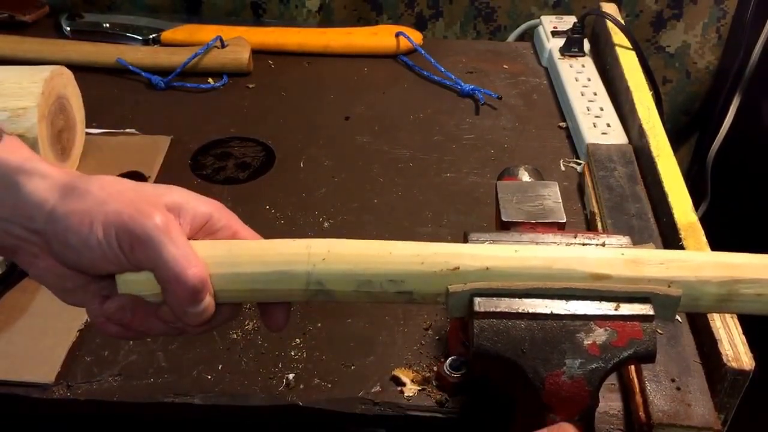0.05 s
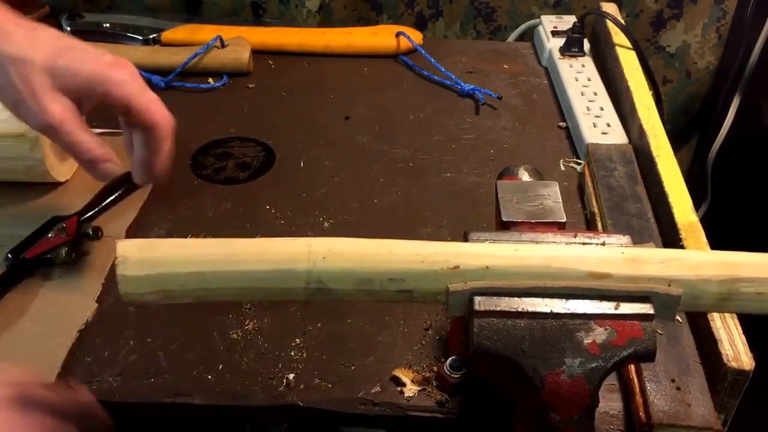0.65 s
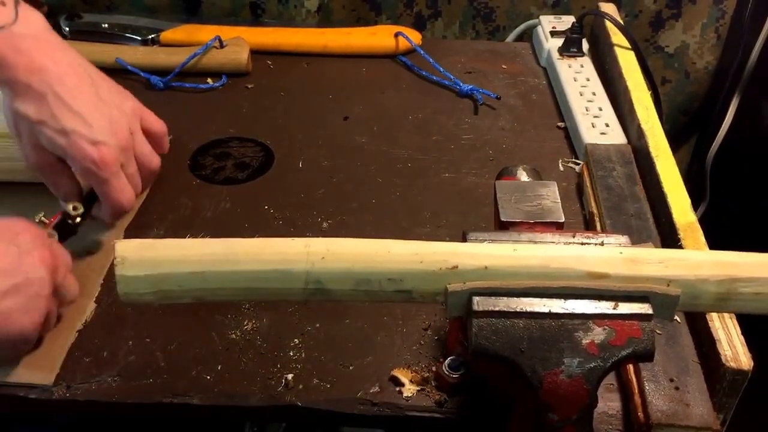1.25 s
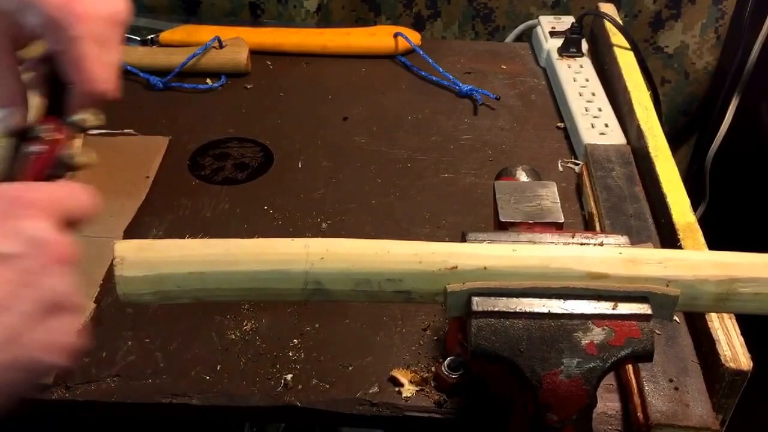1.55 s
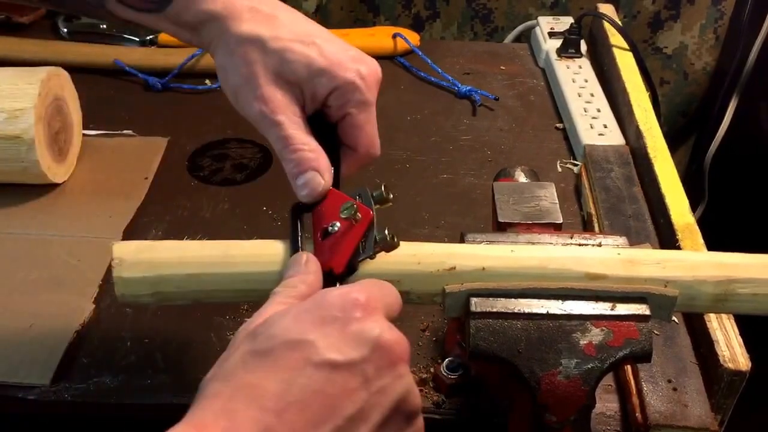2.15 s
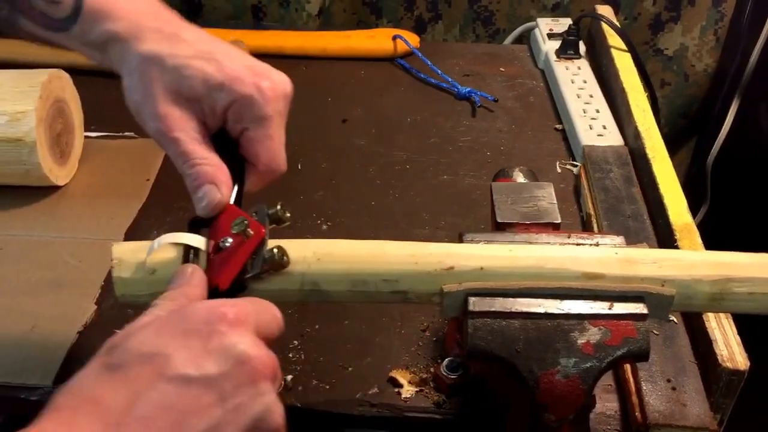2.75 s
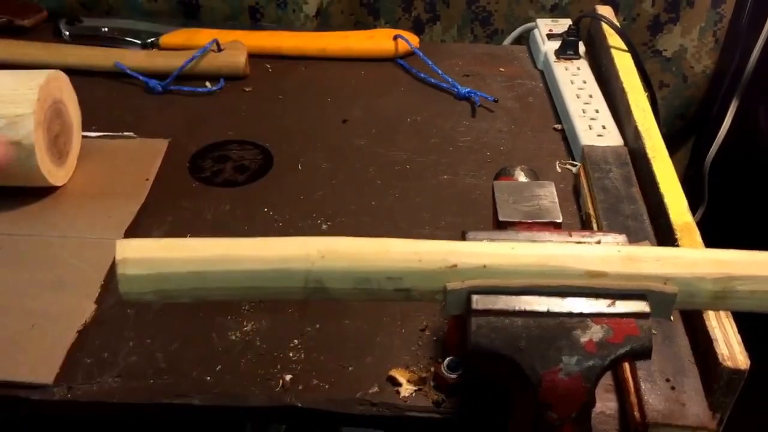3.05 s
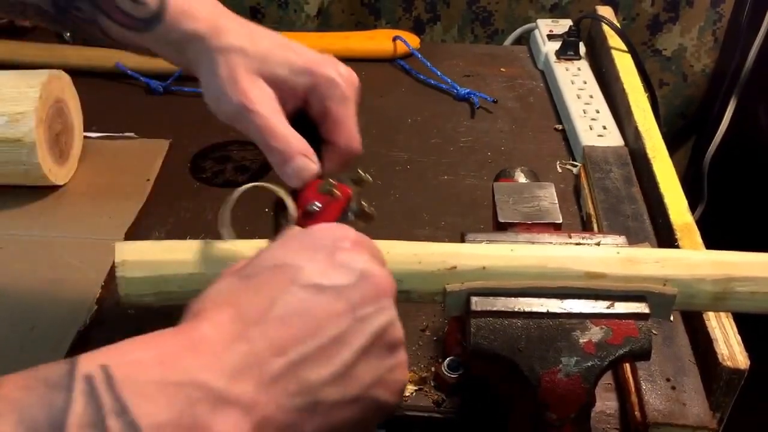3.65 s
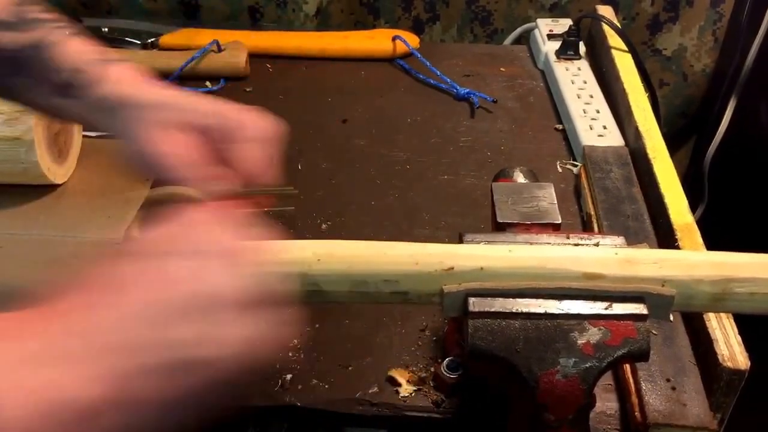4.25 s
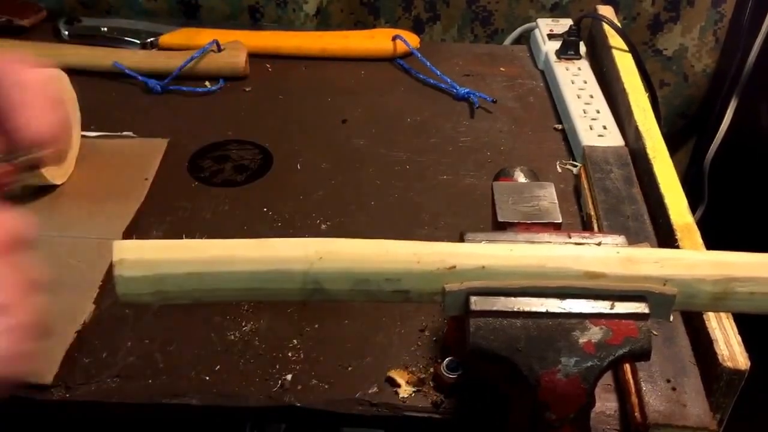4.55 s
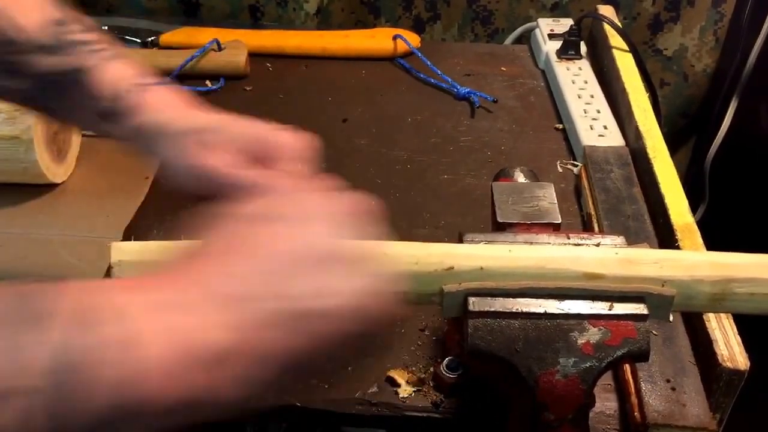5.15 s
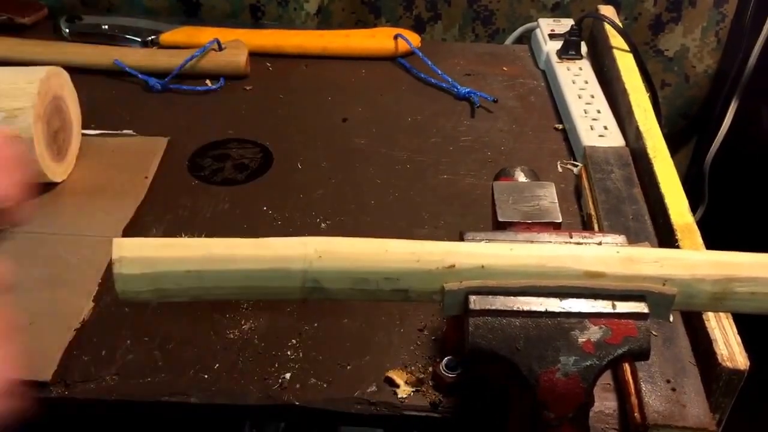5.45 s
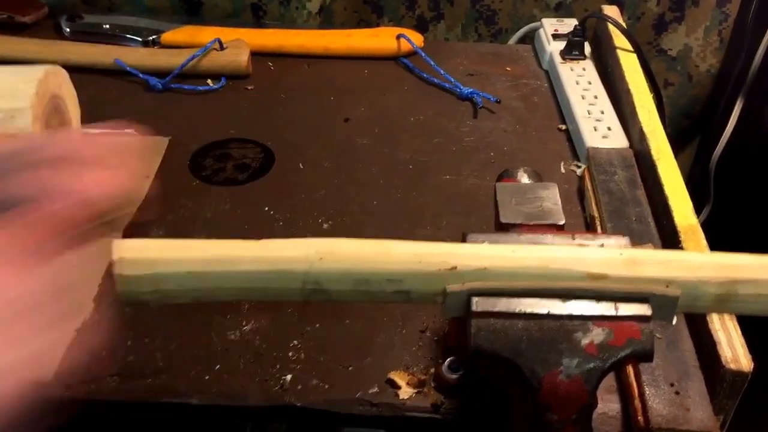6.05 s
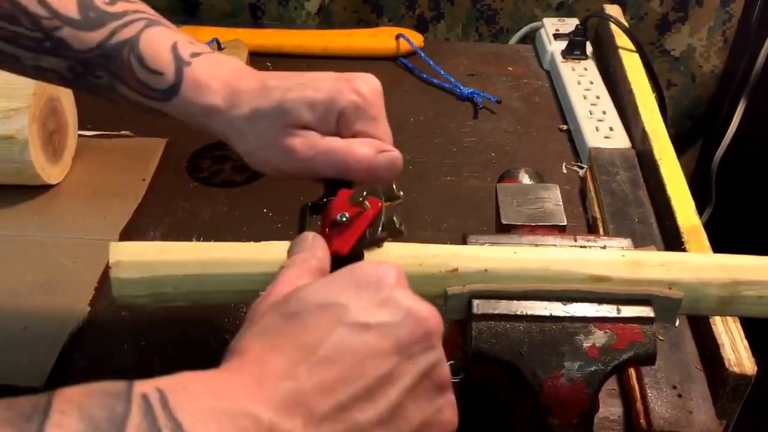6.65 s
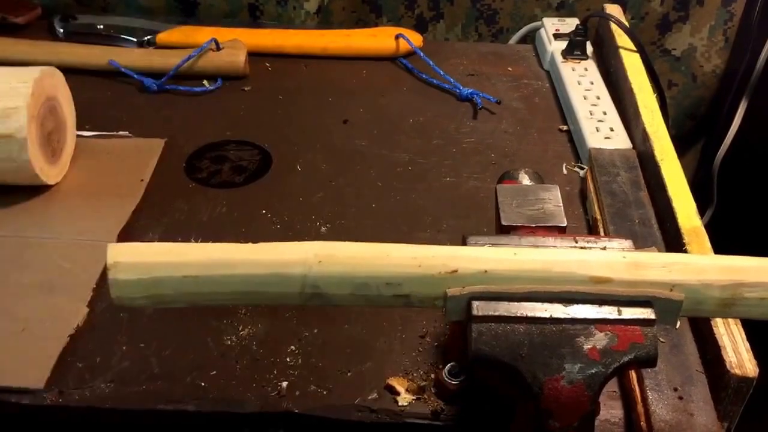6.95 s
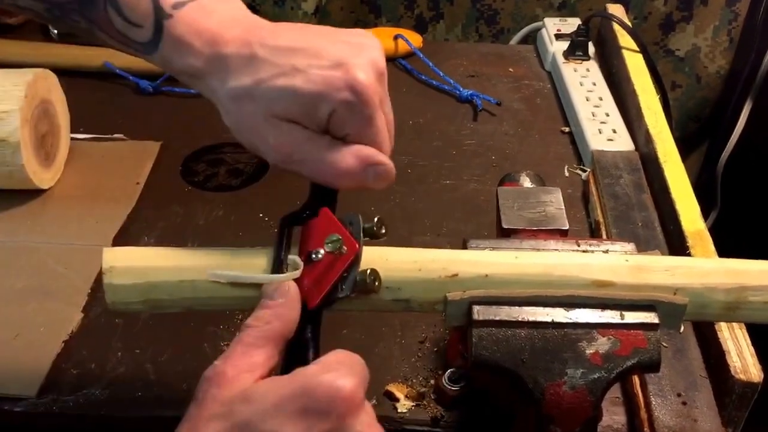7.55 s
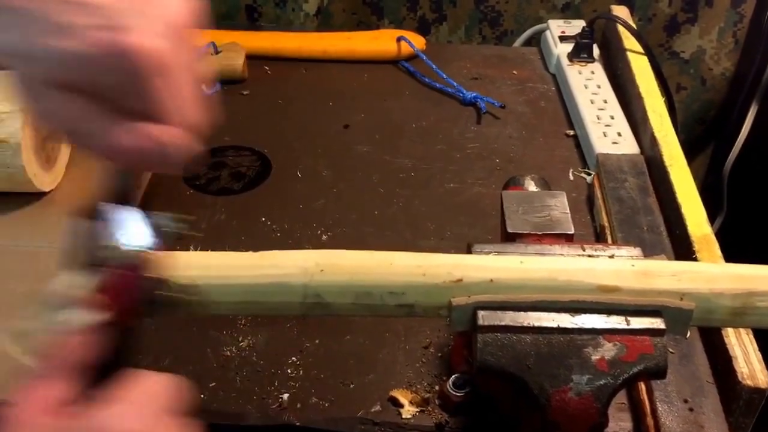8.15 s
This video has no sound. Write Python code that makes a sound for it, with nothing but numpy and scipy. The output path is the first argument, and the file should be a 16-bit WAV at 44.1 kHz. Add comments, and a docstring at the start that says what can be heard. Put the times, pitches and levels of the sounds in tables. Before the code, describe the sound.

In a small, quiet workshop, a light object ticks as it rocks to rest and a tool slides softly off cardboard. After a few knocks, a spokeshave is pulled along a wooden handle in a vise, about once a second. Each short hissing cut ends in a splintery crack and a bench thump, sometimes with a high metal zing. Loose things rattle and the tool knocks between strokes, all heard close up.

```python
"""A spokeshave is pulled in quick strokes along a wooden handle in a bench vise, in a small workshop.
Each cut hisses as fibres break, then the shaving tears off the end: splinters snap, the bench booms,
the blade zings, and loose things on the bench rattle, buzz and tinkle. Tool and handle knock between
strokes. Before the work starts, a light object rocks to rest and the tool slides off cardboard."""
import sys
import numpy as np
from scipy import signal
from scipy.fft import rfft, irfft
from scipy.io import wavfile
from scipy.ndimage import uniform_filter1d

SR = 44100
rng = np.random.default_rng(int(sys.argv[2]) if len(sys.argv) > 2 else 0)


def to_wav(s):
    """Save 16-bit WAV."""
    ch = np.atleast_2d(s).T  # columns
    pcm = np.round(np.clip(ch, -1, 1) * 32767)  # PCM
    wavfile.write(sys.argv[1], SR, pcm.astype(np.int16))


N = 366030

# edges of the bass, mid, bright and treble bands: f/Hz
BAND_EDGES = [45, 280, 1600, 4500, 17000]
# the workshop's tail in those four bands: t60/s, level/dB
ROOM_TAIL = [(0.34, 0.5), (0.31, -8.5), (0.28, -5.5), (0.26, -10)]
# slap off the bench top and the nearest things: delay/s, level/dB
NEAR_ECHOES = [(.00135, -41), (.0031, -20), (.0058, -12)]
# broad EQ of room tone, light taps, breaking fibres and tearing wood: f/Hz, gain/dB
ROOM_EQ = [(18, -70), (30, -12.5), (66, -2.5), (256, -3.5), (315, -2), (379, 1), (505, -12.5),
           (1510, -15.5), (1680, -14), (2240, -13.5), (2760, -17.5), (3590, -20), (4310, -23.5),
           (6720, -25.5), (15500, -33.5)]
TAP_EQ = [(30, -27.5), (100, -4), (400, 4), (1200, 0), (2500, -14.5), (3800, -15.5), (5000, -26.5),
          (8000, -23.5), (11000, -36), (16000, -44)]
FIBRE_EQ = [(30, -10.5), (65, -2), (160, -1.5), (260, -5), (700, 0.5), (1300, 0), (2500, -7.5),
            (3800, -16.5), (5000, -26), (8000, -22), (16000, -27)]
WOOD_EQ = [(30, -18.5), (60, -15.5), (160, -6), (260, -10.5), (700, -7), (1200, -10.5), (2400, -9),
           (4800, -19), (8000, -15.5), (10500, -25), (16000, -30.5)]
# resonances of the rocking object, loose tools and bench with handle: f/Hz, width/Hz, boost/dB
ROCKER_PEAKS = [(461, 8.8, 21), (668, 30, 14.5), (1051, 26, 25.7), (1150, 35, 14.6), (1402, 77, 19.3),
                (2120, 230, 13.3), (3424, 390, 8.9)]
LOOSE_PEAKS = [(135.5, 20, 26.5), (425, 55, 12.8), (730, 80, 14.9), (860, 66, 8.5), (1390, 52, 4.9),
               (2910, 110, 10), (3360, 97, 6.9), (5600, 220, 11), (6450, 250, 10), (13800, 660, 9.8)]
BENCH_PEAKS = [(68.9, 8, 23), (127.7, 21, 24), (207.1, 17, 16.5), (295.4, 10.3, 12.5), (382, 75, 8.5),
               (447.5, 11, 11), (474.2, 14, 14.5), (568, 36, 3), (721.6, 30, 7.5), (842, 34, 9),
               (930, 17, 5.5), (1014, 25, 10), (1087.6, 23, 7.5), (1857, 18, 13), (3040, 40, 1),
               (3145, 47, 8), (3190, 1030, 7), (5630, 880, 6.5), (8400, 68, 5), (9200, 100, 4),
               (14300, 700, 6.5)]
# ringing modes of the rocking object, a steel part, a tiny metal piece, the blade: f/Hz, level/dB, t60/s
ROCKER_MODES = [(1029, -1, 0.039), (1390, 5.5, 0.014), (2360, 18, 0.027), (2660, 8, 0.035)]
STEEL_MODES = [(5810, -23.5, 1), (6174, -4.5, 0.25), (6205, -16, 0.32), (8170, -30, 0.48),
               (8640, -28.5, 0.5)]
TINY_MODES = [(10950, -1, 0.13), (11200, -14, 0.098)]
BLADE_MODES = [(7350, 2.5, 0.072), (7440, -27, .05), (14250, -38, 0.057)]
# ticks of the rocking object: t/s
ROCK_TIMES = [0.056, 0.159, 0.261, 0.365, 0.43, 0.484, 0.682, 0.741, 0.84, 0.909, 1.007, 1.07, 1.152, 1.227,
              1.319, 1.368, 1.452, 1.493, 1.562, 1.598, 1.662]
# loose things rattle after a jolt; negative rates build up instead:
# start/s, end/s, level/dB, fade/(dB/s), hardness/dB, dulling/(dB/s)
RATTLES = [(3.136, 4.046, -34.5, 21, 4.5, 27), (4.467, 5.176, -36, 10.5, 2, 3),
           (5.44, 5.844, -46.5, -24, -4, -7), (6.202, 6.717, -36, 42, 7, 24), (7.92, 8.29, -33, 52, 1, 15)]
# their distinct bounces: t/s
BOUNCE_TIMES = [3.204, 3.332, 3.38, 3.424, 3.486, 3.525, 3.618, 3.678, 3.809, 3.885, 4.532, 4.56, 4.61,
                4.68, 4.738, 4.806, 4.856, 4.916, 5.044, 5.459, 6.329, 6.396, 6.429]
# metal parts sing while they chatter: start/s, end/s, f/Hz, width/Hz, opening level/dB
BUZZES = [(3.445, 3.771, 3700, 250, -64.5), (4.528, 5.128, 2935, 131, -54.5),
          (5.514, 5.721, 3400, 110, -60), (5.742, 5.86, 3411, 230, -49), (6.151, 6.577, 5816, 9.7, -62),
          (6.217, 6.69, 1990, 6.1, -52), (6.255, 6.65, 3531, 89, -60.5), (6.98, 7.103, 3100, 260, -53),
          (7.356, 7.484, 4130, 310, -63.5), (7.394, 7.701, 1660, 110, -60.5),
          (8.133, 8.201, 2003, 7.5, -43), (8.134, 8.246, 3506, 31, -56.5)]
# the steel part pings, the tiny piece tinkles, the blade zings, splinters snap: t/s, level/dB
PINGS = [(2.829, -24.5), (4.529, -44), (6.412, -50), (8.132, -34.5)]
TINKLES = [(3.175, -53), (3.320, -47.5), (6.247, -48), (6.380, -55), (7.047, -39), (7.165, -58),
           (7.950, -49), (8.087, -50.5)]
ZINGS = [(4.384, -19.5), (5.315, -20), (6.119, -25.5), (6.945, -29), (6.958, -25)]
SNAPS = [(3.019, -43.5), (3.046, -29.5), (3.076, -34), (3.083, -36), (4.094, -48), (4.373, -41),
         (4.382, -33), (4.394, -35.5), (5.289, -35), (5.314, -28.5), (5.35, -32), (5.629, -48.5),
         (6.109, -37), (6.119, -30.5), (6.132, -32), (6.162, -38), (6.944, -37), (6.958, -33.5)]
# knocks of tool, handle and things on the bench: t/s, level/dB, hardness/dB, thud/dB, ring f/Hz
KNOCKS = [(0.445, -48, 6.5, 0, 2580), (0.547, -33.5, 10.5, -3, 2060), (0.797, -48, -3, -1, 510),
          (2.829, -37.5, 5, -8, 3700), (2.864, -26, 1.5, -6, 966), (2.926, -30, 0.5, -26, 1390),
          (3.279, -31.5, -1.5, -7, 734), (4.245, -44.5, 3, -2, 2780), (4.943, -30.5, 0.5, -6.5, 1730),
          (5.518, -33, -11, -15, 1170), (6.273, -32.5, -0.5, -4, 650), (6.481, -36, -18, -7, 1140),
          (7.988, -34.5, 0.5, -6, 1260), (8.132, -43, 1.5, -16, 740)]
# the tool's sole lands or bumps on the wood: t/s, level/dB, hardness/dB, thud/dB
LANDINGS = [(1.828, -39.5, 1, 0), (2.128, -49, 4, 7.5), (3.742, -41.5, -2, 3), (4.116, -29, -2.5, -3.5),
            (5.555, -41, -7, -1), (5.628, -25.5, -1.5, -3.5), (5.742, -41, 1.5, 4.5), (5.787, -43.5, 2, 7),
            (6.578, -34.5, 0.5, 0), (6.849, -39, 5, -6), (7.231, -52.5, -19, -6.5), (7.464, -34.5, -1, -3),
            (7.766, -35.5, 0, -8)]
# the tool slides, and the blade cuts: start/s, end/s, level/dB, swell/dB, drag offset/dB, hiss offset/dB
SLIDES = [(0.84, 0.905, -49.5, -8, -1, -13), (0.922, 1.27, -58, -6.5, 2, 4.5), (1.025, 1.045, -59, 9, 2, 8),
          (1.155, 1.205, -56, 2, 9, -3), (1.292, 1.388, -61, 0.5, -20, 9), (1.875, 1.9, -54.5, 4, 11, -8),
          (2.0, 2.17, -60, 5, 7.5, -21), (2.29, 2.39, -64.5, 6, 2, -4.5), (2.44, 2.53, -62.5, 3, 9.5, -22)]
STROKES = [(2.701, 2.791, -40.5, -2, 4, -8), (2.989, 3.036, -39.5, 22, 4, -1.5),
           (4.034, 4.121, -43.5, 8.5, 8, -8), (4.311, 4.373, -43, 17, 6.5, -3),
           (5.214, 5.287, -36, 6, 2.5, -7.5), (6.027, 6.107, -36, 0, 4.5, -6),
           (6.846, 6.924, -40.5, 12, 5, -3.5), (7.762, 7.854, -38, 7.5, 6.5, -7)]
# the shaving tears off the end: t/s, length/s, crunch level/dB, boom level/dB, hardness/dB
TEARS = [(3.047, 0.045, -23, -21, -2.5), (4.38, 0.047, -24, -15.5, 1.5), (5.296, 0.049, -26, -17, 0),
         (6.12, 0.049, -23, -21, -4), (6.938, 0.032, -23, -15.5, 1), (7.869, 0.035, -35, -22.5, -7.5)]


def from_db(db):
    return 10 ** (np.asarray(db) / 20)


def rms_one(x):
    return x / np.sqrt(np.mean(x ** 2) + 1e-20)


def add(out, s, sound):
    """Mixes a sound in from time s on."""
    at = int(s * SR)
    out[at:at + len(sound)] += sound[:N - at]


def band(x, low_hz, high_hz):
    return signal.sosfilt(signal.butter(3, [low_hz, high_hz], "band", fs=SR, output="sos"), x)


def through(x, response):
    return signal.fftconvolve(x, response)[:len(x)]


def drift(per_s):
    """Random wobble with an RMS of 1."""
    knots = rng.standard_normal(int(N / SR * per_s) + 2)
    return rms_one(np.interp(np.arange(N) / SR * per_s, np.arange(len(knots)), knots))


def envelopes(spans, rise, fall):
    """One gain curve per dB column; each span fades in and out by 60 dB over rise and fall seconds."""
    t, out = np.arange(N) / SR, 0
    for rows in spans:
        s, *columns = np.transpose(rows)
        fade_db = -60 * (np.maximum(s[0] - t, 0) / rise + np.maximum(t - s[-1], 0) / fall)
        out = out + from_db([np.interp(t, s, db) + np.maximum(fade_db, -150) for db in columns])
    return out


def body(eq, peaks, size=8192):
    """Impulse response of a broad EQ curve with resonances standing out of it."""
    hz = np.maximum(np.arange(size // 2 + 1) * SR / size, 1)
    eq_hz, eq_db = np.transpose(eq)
    power = 1 + sum((from_db(db) ** 2 - 1) / (1 + (2 * (hz - f) / width) ** 2) for f, width, db in peaks)
    gain = from_db(np.interp(np.log(hz), np.log(eq_hz), eq_db)) * np.sqrt(np.maximum(power, .1))
    # minimum phase: no ring ahead of the hit
    cepstrum = irfft(np.log(gain))
    cepstrum[1:size // 2] *= 2
    cepstrum[size // 2 + 1:] = 0
    return irfft(np.exp(rfft(cepstrum)))


def grains(per_s, spread_db):
    """Random tiny clicks of uneven size."""
    sizes = from_db(spread_db * np.minimum(rng.exponential(1, N), 4))
    return rms_one(sizes * rng.standard_normal(N) * (rng.random(N) < per_s / SR))


def contact(s, db, hardness_db, thud_db=0, *ring_hz):
    """A hit's cue with four band levels: weight lifts the bass, hardness the bright and treble."""
    return (s, db + thud_db, db, db + hardness_db, db + 1.72 * hardness_db, *ring_hz)


def hits(cues, response, t60, rise, crack, thump, room_db, trim_db, ring_db=0, ring_width_hz=90):
    """Each hit sends a push, a short scatter of reflections and the room's tail through a body."""
    out, t = np.zeros(N), np.arange(SR // 2) / SR
    attack_samples = SR // 50
    for s, *columns in cues:
        levels_db, rings_hz = columns[:4], columns[4:]
        scatter = rng.standard_normal(len(t)) * (1 - np.exp(-t / rise))
        for k, (tail_t60, tail_db) in enumerate(ROOM_TAIL):
            force = scatter * (from_db(-60 * t / t60) + from_db(tail_db + room_db - 60 * t / tail_t60))
            force[0] += crack if k else thump   # the bass feels the whole contact as one push
            sound = through(force, response)
            for hz in rings_hz:   # the struck spot favours one ring
                peak = signal.iirpeak(hz, hz / ring_width_hz, SR)
                sound = sound + from_db(ring_db) * signal.lfilter(*peak, sound)
            sound = band(sound, BAND_EDGES[k], BAND_EDGES[k + 1])
            strength = np.sqrt(np.sum(sound ** 2) / attack_samples)
            add(out, s, sound / strength * from_db(levels_db[k] + trim_db[k]))
    return out


def ring(touches, modes, rise):
    """Every touch sets the modes ringing, each with a slightly different strength."""
    out, t = np.zeros(N), np.arange(SR) / SR
    for s, touch_db in touches:
        partials = sum(np.sin(2 * np.pi * hz * t) * from_db(db + rng.normal(0, 1.54) - 60 * t / t60)
                       for hz, db, t60 in modes)
        add(out, s, partials * from_db(touch_db) * (1 - np.exp(-t / rise)))
    return out


def pressure_ramp(start, end, db, swell_db, drag_db, hiss_db):
    """Low drag, mid cut and top hiss follow the pressure along a pull, the hiss a little less."""
    return [(s, db + change + drag_db, db + change, db + 0.81 * change + hiss_db)
            for s, change in ((start, -swell_db / 2), (end, swell_db / 2))]


def scrape(pulls, per_s, spread_db, judder_db, rise, fall, trim_db):
    """Fibres catch and break under the tool; its judder clumps them, and the bench colours them."""
    fractures = grains(per_s, spread_db) * from_db(judder_db * drift(160))
    sound = through(fractures, body(FIBRE_EQ, BENCH_PEAKS))
    gains = envelopes([pressure_ramp(*pull) for pull in pulls], rise, fall)
    out = 0
    for gain, db, edges_hz in zip(gains, trim_db, [(35, 280), (280, 4500), (4500, 17000)]):
        part = band(sound, *edges_hz)
        # the grain is held at a steady loudness, so each pull swells or fades smoothly
        running_rms = np.sqrt(np.abs(uniform_filter1d(part ** 2, size=SR // 16)) + 1e-12)
        out = out + gain * from_db(db) * part / running_rms
    return out


def room_tone():
    """A quiet, dark bed of workshop air."""
    return from_db(-61.5) * rms_one(through(rng.standard_normal(N), body(ROOM_EQ, [])))


def near_field(x):
    """Close surfaces comb the upper range into narrow peaks and dips."""
    upper = band(x, 1300, 17000)
    out = x.copy()
    for delay, db in NEAR_ECHOES:
        add(out, delay, upper * from_db(db))
    return out


def rocking_object(settle_s=1.33):
    """A light object rocks from foot to foot, ticking and ringing, then comes quickly to rest."""
    s = np.array(ROCK_TIMES)
    fade_db_per_s = 5.5 + 2.0 * (np.arange(len(s)) % 2)   # one foot fades faster
    lost_db = fade_db_per_s * s + 36 * np.maximum(s - settle_s, 0)
    db = -41 - lost_db
    hardness_db = 0.21 * lost_db   # small swings tick more thinly
    ticks = hits(map(contact, s, db, hardness_db), body(TAP_EQ, ROCKER_PEAKS), t60=0.038, rise=0.0013,
                 crack=6.0, thump=5.4, room_db=-5, trim_db=(-10.0, -0.5, -5.5, -33))
    return ticks + ring(zip(s, db - 8.5), ROCKER_MODES, rise=0.0029)


def metal_buzz(fade_db=-11.5, flare_db=-5, flare_t60=0.066):
    """Fine chatter keeps one resonance of each loose metal part alive; it flares at every bounce."""
    out, flare = np.zeros(N), np.ones(N)
    t = np.arange(SR // 4) / SR
    for s in BOUNCE_TIMES:
        add(flare, s, from_db(flare_db - 60 * t / flare_t60))
    for start, end, hz, width_hz, db in BUZZES:
        peak = signal.iirpeak(hz, hz / width_hz, SR)
        tone = signal.lfilter(*peak, signal.lfilter(*peak, grains(1500, 3.5)))
        gain, = envelopes([[(start, db), (end, db + fade_db)]], rise=0.036, fall=0.1)
        out += gain * rms_one(tone)
    return out * flare


def small_metal():
    """Light touches make a steel part ping and a tiny piece tinkle."""
    return ring(PINGS, STEEL_MODES, rise=0.0019) + ring(TINKLES, TINY_MODES, rise=0.0024)


def rattle_at(s, rattle):
    """Level and hardness of a rattle at time s; most grow weaker and duller."""
    start, end, db, fade, hardness_db, dulling = rattle
    return db - fade * (s - start), hardness_db - dulling * (s - start)


def shiver(loose):
    """Loose things keep buzzing against the bench top after each jolt."""
    chatter = through(grains(2500, 4.1) * from_db(3.9 * drift(50)), loose)
    # level for the low layer, level plus hardness for the fizz
    spans = [[(s, *np.cumsum(rattle_at(s, rattle))) for s in rattle[:2]] for rattle in RATTLES]
    low_gain, fizz_gain = envelopes(spans, rise=.1, fall=0.28)
    low = from_db(-9) * low_gain * rms_one(band(chatter, 190, 1900))
    fizz = from_db(-25) * fizz_gain * rms_one(band(chatter, 1700, 9000))
    return low + fizz


def bounces(loose, ring_hz=749, spread_octaves=0.485):
    """Loose things bounce as they rattle, each time on another spot with its own hollow ring."""
    cues = [contact(s, *rattle_at(s, rattle), 0, ring_hz * 2 ** rng.normal(0, spread_octaves))
            for rattle in RATTLES for s in BOUNCE_TIMES if rattle[0] <= s <= rattle[1]]
    return hits(cues, loose, t60=0.036, rise=0.00076, crack=5.3, thump=17, room_db=0,
                trim_db=(-8.5, -0.5, -9.5, -18.5), ring_db=6, ring_width_hz=80)


def knocks(bench):
    """Tool, handle and other things strike the bench: short, pitched, woody knocks."""
    return hits([contact(*row) for row in KNOCKS], bench, t60=0.045, rise=0.001, crack=11, thump=22,
                room_db=4.0, trim_db=(0.4, -0.66, -7.0, -22.0), ring_db=10.5, ring_width_hz=127)


def sole_landings(bench):
    """The tool's sole meets the wood with a rounder, longer bump."""
    return hits([contact(*row) for row in LANDINGS], bench, t60=0.12, rise=0.004, crack=7.7, thump=24,
                room_db=2.5, trim_db=(3, 1.34, -12, -25.5))


def tool_slides():
    """The tool rubs softly over cardboard, then its sole shifts on the wood."""
    return scrape(SLIDES, per_s=4800, spread_db=0.5, judder_db=2.5, rise=0.09, fall=0.059,
                  trim_db=(-.6, -1.1, -.6))


def blade_zings():
    """The blade springs free of the wood and rings, high and short."""
    return ring(ZINGS, BLADE_MODES, rise=0.0023)


def shaving_tears(lead_s=0.009, jitter_s=0.0015, uneven_db=1.5):
    """A quick run of fibres gives way, the handle springs back and booms the bench, splinters snap."""
    wood = body(WOOD_EQ, BENCH_PEAKS)
    booms, crunch = [], []
    for s, length, db, boom_db, hardness_db in TEARS:
        booms.append(contact(s, boom_db, hardness_db))
        for onset in s - lead_s + np.linspace(0, length, 5):
            late, louder = rng.standard_normal(2)
            crunch.append(contact(onset + jitter_s * late, db + uneven_db * louder, hardness_db))
    snaps = [contact(s, db, 0) for s, db in SNAPS]
    return (hits(booms, wood, t60=0.11, rise=0.00067, crack=5, thump=42, room_db=-9,
                 trim_db=(1.1, -13, -18, -42))
            + hits(crunch, wood, t60=0.056, rise=0.00066, crack=7.4, thump=23, room_db=-1.5,
                   trim_db=(-5.5, -0.9, -12.0, -27))
            + hits(snaps, wood, t60=0.041, rise=0.00071, crack=6.0, thump=29, room_db=-6.0,
                   trim_db=(-0.5, -1.5, 3.5, -1.6)))


def spokeshave_cuts():
    """The blade breaks a dense stream of fibres: one hiss for each pull."""
    return scrape(STROKES, per_s=7000, spread_db=-2.5, judder_db=2.0, rise=0.051, fall=0.13,
                  trim_db=(-.3, .3, -.3))


def scene():
    """Mono mix: the woodwork with its close echoes, ringing details on top, room tone underneath."""
    bench, loose = body(TAP_EQ, BENCH_PEAKS), body(TAP_EQ, LOOSE_PEAKS)
    work = spokeshave_cuts() + tool_slides() + shaving_tears()
    clatter = knocks(bench) + sole_landings(bench) + bounces(loose)
    metal = small_metal() + blade_zings()
    bed = room_tone()
    close = near_field(work + clatter + shiver(loose))
    return (close + rocking_object() + metal + metal_buzz() + bed)[None]


def record(dry, cutoff_hz=15800):
    """A steep low-pass takes off the very top."""
    return signal.sosfilt(signal.ellip(12, .1, 90, cutoff_hz, fs=SR, output="sos"), dry)


dry = scene()
out = record(dry)
to_wav(out)
```